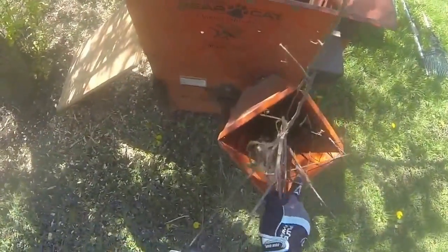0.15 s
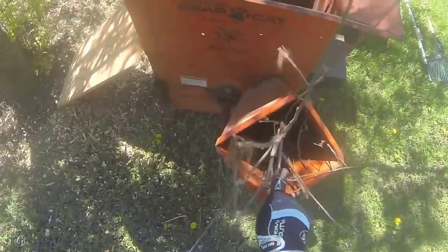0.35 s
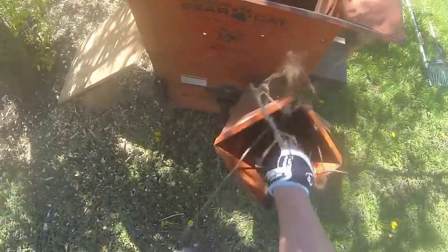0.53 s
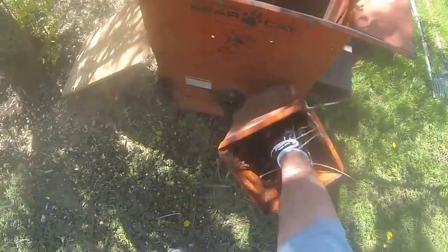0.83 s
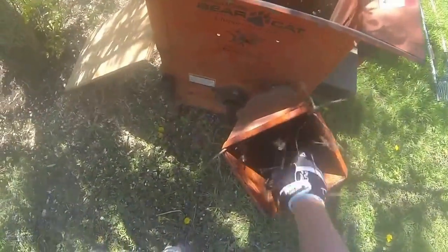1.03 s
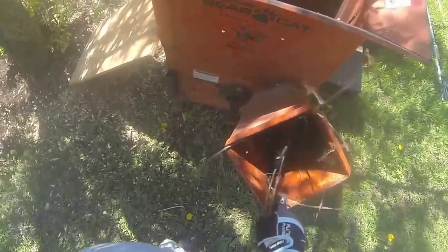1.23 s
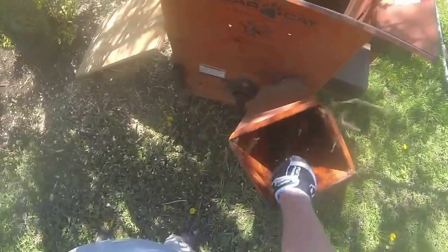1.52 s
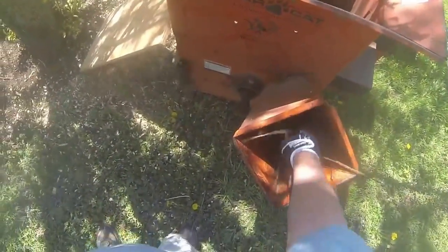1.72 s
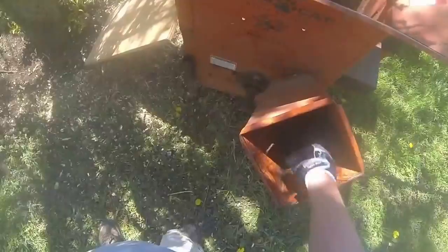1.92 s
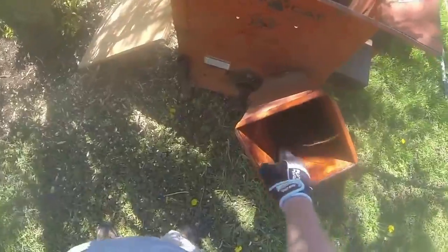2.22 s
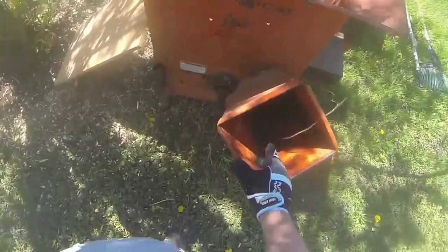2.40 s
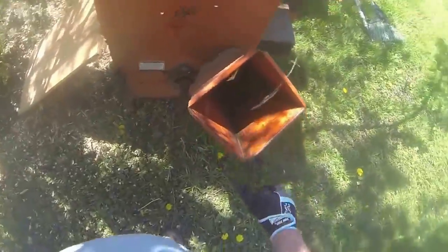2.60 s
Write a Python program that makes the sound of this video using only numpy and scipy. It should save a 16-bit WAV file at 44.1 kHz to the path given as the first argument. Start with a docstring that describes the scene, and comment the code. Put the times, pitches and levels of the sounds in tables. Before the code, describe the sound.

Wood chipper running steadily in a yard, roaring and crackling harshly as branches are fed in twice

```python
"""An engine drones and air roars in a yard; then a wood chipper chops two handfuls of branches.
The four-knife rotor turns about 35 times a second, its speed sagging under load; it hums at its multiples.
Each knife pass bursts noise and growls in thick stems; stubs tick on two knives; hopper modes and brief
tones ring. Blows of thick pieces and twig snaps stand out. All but the hopper, the brief tones and the
ringing case is coloured by the resonances of a closed camera housing."""
import sys
import numpy as np
from scipy import signal
from scipy.io import wavfile
from scipy.ndimage import uniform_filter1d

SR = 44100
rng = np.random.default_rng(int(sys.argv[2]) if len(sys.argv) > 2 else 0)


def master_out(mix):
    """Clip the mix to full scale and print it as 16-bit PCM to the path in sys.argv[1]."""
    frames = np.transpose(np.atleast_2d(mix))
    ceiling = np.clip(frames, -1, 1)
    pcm = np.round(ceiling * 32767).astype(np.int16)
    wavfile.write(sys.argv[1], SR, pcm)


def gain_from_decibels(decibels):
    """Convert decibel values to linear amplitude factors."""
    exponent = np.asarray(decibels, float) / 20
    return 10 ** exponent


N = 121275
T = np.arange(N) / SR  # time [s]

# Levels in the tables are relative: the sources add offsets, and the housing colours most of them.
# rotor speed: (time [s], speed [turns/s])
ROTOR_SPEED = [(0, 35.1), (.45, 35.08), (.65, 34.45), (.8, 33.9), (1, 33.95), (1.25, 34.45), (1.7, 34.4),
               (1.9, 34.2), (2.2, 34.3), (2.4, 34.65), (2.75, 34.9)]
# wood against the knives: (time [s], load [dB])
WOOD_LOAD = [(0, -33.5), (.38, -32), (.46, -22.5), (.55, -12), (.8, -16.5), (.93, -26.5), (1.05, -25.5),
             (1.25, -22), (1.31, -19), (1.37, -28), (1.5, -22.5), (1.59, -15.5), (1.78, -14), (1.92, -20),
             (2.01, -21.5), (2.09, -16), (2.25, -26), (2.36, -38)]
# depth of cut, heard in the knife tone: (time [s], depth [dB])
CUT_DEPTH = [(.44, -55), (.53, -29), (.62, -26), (.81, -26), (.95, -41), (1.03, -43), (1.17, -37),
             (1.22, -46), (1.3, -35), (1.34, -46), (1.5, -46), (1.6, -33), (1.74, -26), (1.86, -33),
             (2.02, -36), (2.09, -31), (2.18, -38), (2.32, -55)]
# thickness of the stems being fed: (time [s], level [dB])
STEM_THICKNESS = [(0, -9), (.5, -11), (.9, -15), (1.5, -25), (1.8, 5.5), (2, 3.5), (2.15, 8), (2.3, -10)]
# thin stubs grazing two opposite knives: (time [s], tick level [dB], leafy smear level [dB])
GRAZING_STUBS = [(0, -48, -46), (.36, -46, -46), (.42, -38, -36), (.5, -36, -36), (.7, -36, -36),
                 (.9, -42, -42), (1.05, -36, -40), (1.2, -33, -40), (1.35, -36, -42), (1.48, -38, -42),
                 (1.58, -36, -34), (1.75, -36, -34), (2, -38, -40), (2.25, -40, -44), (2.32, -30, -42),
                 (2.42, -34, -54), (2.5, -33, -56), (2.75, -34, -58)]
# hard stub strikes: (time [s], level [dB])
STUB_STRIKES = [(1.3444, -31), (1.3487, -14), (1.379, -16), (1.4082, -12), (1.4436, -18), (2.4558, -30.5)]
# thick pieces knocked through: (time [s], level [dB], length [s])
THICK_KNOCKS = [(0.5142, -5.5, 0.0066), (0.531, -11.5, 0.0064), (0.58, -15, 0.005), (0.637, -15, 0.0059),
                (0.6609, -6, 0.0038), (0.6922, -3.5, 0.0046), (0.7183, -0.5, 0.0042), (0.746, -17, 0.0059),
                (0.7737, -2, 0.0068), (0.8034, 1.5, 0.0053), (1.3049, -8, 0.005), (1.594, -7, 0.0081),
                (1.727, -3.5, 0.0092), (1.7886, -8, 0.0046), (1.801, -2, 0.0072), (1.8256, -1.5, 0.005),
                (1.936, -4.5, 0.0046), (1.9417, -4.5, 0.01), (1.9634, -3, 0.0033), (1.9726, -3, 0.0047),
                (2.0737, -3.5, 0.0057), (2.0886, -6.5, 0.0063), (2.1, -4, 0.0047), (2.113, -9, 0.0057),
                (2.2154, -3.5, 0.005), (2.2811, -7.5, 0.0043), (2.2878, -10, 0.0037)]
# twig snaps: (time [s], level [dB], frequency [Hz])
TWIG_SNAPS = [(.418, -24, 3380), (.433, -21, 3540), (.447, -24, 2520), (.505, -10.5, 3700),
              (1.707, -14, 3580), (2.278, -20, 2800)]
# rotor hum: (multiple of speed [1], idle level [dB], level at full depth [dB])
ROTOR_ORDERS = [(2.03, -56.5, -63), (3.99, -54, -25.5), (6.084, -47, -43), (7.94, -62.5, -34.5),
                (9.08, -56.5, -43), (10.195, -54.5, -49), (12, -52, -50), (14.08, -54, -38.5),
                (15, -74, -35), (15.9, -90, -43.5), (18.1, -56.5, -34), (19.81, -96, -36),
                (22.08, -54.5, -41), (30, -58.5, -35), (12.95, -66, -46.5), (18.68, -55, -39),
                (23.85, -58, -34), (27.75, -50, -59), (35.6, -63.5, -36)]
# exhaust tones: (frequency [Hz], level [dB])
EXHAUST_TONES = [(91.5, -48), (183, -48.5), (266, -54.5)]
# hopper panel modes: (frequency [Hz], width [Hz], level at full depth [dB])
HOPPER_MODES = [(306, 3.7, -40.5), (631, 12, -36), (1416, 25, -31.5), (1483, 10.8, -23.5)]
# brief ringing tones: a rotor multiple near 975 Hz, then panel tones near 306 Hz:
# (time [s], level [dB], frequency [Hz], 60 dB decay time [s])
BRIEF_TONES = [(.44, -28, 975, .25), (0.621, -42, 307, 1.5), (.78, -33, 306, 1.9), (1.699, -30, 308, 1.8),
               (2.08, -29, 304, 1), (2.21, -33, 305, 0.54)]
# bite of each knife: (level [dB])
KNIFE_BITE = [-4.5, 0.8, -1, 6.3]
# source colours before the housing, each: (frequency [Hz], level [dB])
IDLE_COLOUR = [(20, 12), (50, 0.5), (200, 11.5), (700, 7), (1500, 3.5), (4000, 0), (8000, 1), (15000, -8)]
CHOP_COLOUR = [(20, -39), (80, -6), (250, 0.5), (700, 6), (1500, 5), (4000, 5.5), (8000, 7), (15000, -4.5)]
TICK_COLOUR = [(500, 0), (2500, -21), (5000, 3), (9000, 6.5), (15000, -2.5)]
STRIKE_COLOUR = [(500, -26), (2500, -14), (5000, 7.5), (9000, 4.5), (15000, -14)]
KNOCK_COLOUR = [(200, -22), (600, -1), (1400, 3), (2600, 5), (6000, -22), (15000, -38)]
STEM_COLOUR = [(250, -32), (450, -7), (650, 1.5), (850, -7), (1100, -21.5)]
# broad tilt of the camera housing: (frequency [Hz], level [dB])
HOUSING_TILT = [(20, -0.5), (900, 0), (1100, -4.5), (1950, -3.5), (3300, 2), (4500, -9), (8000, -14),
                (15000, -15.5)]
# resonances of the camera housing: (frequency [Hz], width [Hz], level [dB])
HOUSING_MODES = [(1258, 77, 10), (1344, 74, 20.5), (1490, 250, 12.5), (1584, 180, 13), (1687, 55, 12.5),
                 (2306, 223, 6), (2740, 268, 6), (3210, 67, -1.5), (3700, 270, -1.5), (5205, 480, 3.5),
                 (5430, 640, 0.5), (6190, 800, -2), (8670, 2800, -13), (11270, 1900, -11)]

START_TURN = -.01  # rotor angle at time zero [turns]
KNIVES = 4
IDLE_DB, IDLE_BEAT = -33, 0.21  # roar offset [dB], beat depth [1]
FULL_DEPTH_DB, FULL_LOAD_DB = -26, -13.5  # table levels taken as 0 dB
CHOP_DB, CHOP_BED, CHOP_S, CHOP_SPREAD_DB = -6.5, 0.59, 0.004, 2.5  # offset, bed [1], decay, spread
SPLINTERS_PER_S, SPLINTER_DB = 1500, -26  # mean rate, least level
TICK_DB, TICK_S, SMEAR_S, TICK_SPREAD_DB = 16.5, 0.001, 0.0042, 2.5  # offset, two decays, spread
STRIKE_DB, KNOCK_DB, GROWL_DB = 4.5, -6.5, -11.5  # offsets
CASE_HZ = 1394  # nominal case resonance, detuned at each knock
CEILING, EDGE_HZ = 1.05, 14900  # overload limit [full scale], treble limit [Hz]


def evened(x):
    """Normalisation: a signal divided by its rms value has unit power."""
    return x / np.sqrt(np.mean(x ** 2) + 1e-20)


def curve(points):
    """Linear interpolation of a two-column table over time."""
    return np.interp(T, *np.transpose(points))


def read(points, hz):
    """Interpolation of a level over logarithmic frequency."""
    f, value = np.transpose(points)
    return np.interp(np.log(hz + 1), np.log(f + 1), value)


def colour(x, gain_db):
    """Minimum-phase filtering: the Hilbert transform of the log gain gives the phase of a causal filter."""
    log_gain = np.log(gain_from_decibels(gain_db(abs(np.fft.fftfreq(8192, 1 / SR)))))
    response = np.exp(np.conj(signal.hilbert(log_gain)))
    taps = np.fft.ifft(response).real[:4096]
    return signal.oaconvolve(x, taps)[:N]


def wander(seconds):
    """Slow chance: white noise smoothed by two moving averages, at unit rms."""
    size = max(int(seconds * SR), 2)
    smooth = uniform_filter1d(rng.standard_normal(N), size)
    return evened(uniform_filter1d(smooth, size))


def bursts(clicks, decay_s):
    """Impulse response of an impact: a quick rise followed by exponential decay."""
    t = np.arange(2000) / SR / decay_s
    return signal.oaconvolve(clicks, (1 - np.exp(-3 * t)) * np.exp(-t))[:N]


def clicks_at(events):
    """Impulses: an event is one sample of given level."""
    out = np.zeros(N)
    for s, db in events:
        out[round(s * SR)] = gain_from_decibels(db)
    return out


def turns():
    """Rotor angle [turns] is the time integral of rotor speed."""
    return START_TURN + np.cumsum(curve(ROTOR_SPEED)) / SR


def knife_passes(spread_db):
    """Periodic excitation: one click of chance size as each knife passes, with the knife number."""
    step = np.floor(KNIVES * turns() + .34)
    size = gain_from_decibels(spread_db * rng.standard_normal(N))
    passing = np.diff(step, prepend=step[0]) > 0
    return size * passing, step.astype(int) % KNIVES


def depth():
    """Depth of cut as a gain, falling far below unity when the knives run free."""
    depth_db = np.interp(T, *np.transpose(CUT_DEPTH), left=-70, right=-70)
    return gain_from_decibels(depth_db - FULL_DEPTH_DB)


def idling():
    """Amplitude modulation: air and engine roar beats at the knife rate, over wavering exhaust tones."""
    beat = 1 + IDLE_BEAT * np.cos(2 * np.pi * KNIVES * turns())
    gate = beat * gain_from_decibels(1.0 * wander(0.1))
    out = colour(rng.standard_normal(N) * gate, lambda hz: read(IDLE_COLOUR, hz) + IDLE_DB)
    for hz, db in EXHAUST_TONES:
        level = gain_from_decibels(db + 2.5 + 0.73 * wander(0.036))
        out += level * np.sin(2 * np.pi * hz * T + 0.21 * wander(0.094))
    return out


def hum():
    """Order tones: multiples of rotor speed vary with depth of cut, the higher ones wavering more."""
    out, deep, angle = np.zeros(N), depth(), turns()
    for order, idle_db, full_db in ROTOR_ORDERS:
        cutting = gain_from_decibels(full_db + 3 + .25 * order ** .5 * wander(.06)) * deep
        phase = 2 * np.pi * (order * angle + rng.random()) + 0.016 * order * wander(0.13)
        out += (gain_from_decibels(idle_db + 3) + cutting) * np.sin(phase)
    return out


def chopping():
    """Gated noise: each knife pass bursts, over a steady grinding bed and splinters at random times."""
    clicks, knife = knife_passes(CHOP_SPREAD_DB)
    bites = bursts(clicks * gain_from_decibels(KNIFE_BITE)[knife], CHOP_S)
    splinter_db = SPLINTER_DB + 2.3 * np.minimum(rng.exponential(1, N), 4)
    splinters = gain_from_decibels(splinter_db) * (rng.random(N) < SPLINTERS_PER_S / SR)
    gate = evened(CHOP_BED + bites + bursts(splinters, 0.0014))
    gate = gate * gain_from_decibels(curve(WOOD_LOAD) + CHOP_DB + 1.06 * wander(0.03))
    return colour(gate * rng.standard_normal(N), lambda hz: read(CHOP_COLOUR, hz))


def ticking():
    """Brief contact excites high frequencies: ticks and longer smears on two knives, and hard strikes."""
    clicks, knife = knife_passes(TICK_SPREAD_DB)
    s, tick_db, smear_db = np.transpose(GRAZING_STUBS)
    odd = clicks * (knife % 2) * gain_from_decibels(TICK_DB)  # two opposite knives
    ticks = bursts(odd * gain_from_decibels(np.interp(T, s, tick_db)), TICK_S)
    smears = bursts(odd * gain_from_decibels(np.interp(T, s, smear_db)), SMEAR_S)
    hard = bursts(clicks_at(STUB_STRIKES) * gain_from_decibels(STRIKE_DB), 0.0013)
    grazing = colour((ticks + smears) * rng.standard_normal(N), lambda hz: read(TICK_COLOUR, hz))
    return grazing + colour(hard * rng.standard_normal(N), lambda hz: read(STRIKE_COLOUR, hz))


def growl():
    """Forced vibration: thick stems shudder against the chute at every knife pass."""
    clicks, _ = knife_passes(5.3)
    level_db = curve(WOOD_LOAD) - FULL_LOAD_DB + curve(STEM_THICKNESS) + GROWL_DB
    gate = evened(0.51 + bursts(clicks, .003)) * gain_from_decibels(level_db)
    return colour(gate * rng.standard_normal(N), lambda hz: read(STEM_COLOUR, hz))


def hopper():
    """Modal resonance: noise that follows the depth of cut shakes the sheet-metal modes."""
    out = np.zeros(N)
    shaking = depth() * rng.standard_normal((len(HOPPER_MODES), N))
    for (hz, width_hz, db), force in zip(HOPPER_MODES, shaking):
        # shift the mode to zero frequency, smooth it there, and shift it back
        turn, r = np.exp(2j * np.pi * hz * T), np.exp(-np.pi * width_hz / SR)
        mode = (turn * signal.lfilter([1], [1, -r], force / turn)).real
        out += gain_from_decibels(db) * np.sqrt(4 * (1 - r)) * mode
    return out


def knocking():
    """Impact noise: a thick piece gives one decaying burst, a twig snap a noisy, fast-dying tone."""
    gate = np.zeros(N)
    for s, db, length in THICK_KNOCKS:
        gate += bursts(clicks_at([(s, db)]) * gain_from_decibels(KNOCK_DB), length / 2)
    out = colour(gate * rng.standard_normal(N), lambda hz: read(KNOCK_COLOUR, hz))
    t = np.arange(800) / SR
    for s, db, hz in TWIG_SNAPS:
        rough = 1 + 0.44 * rng.standard_normal(800)
        out[round(s * SR):][:800] += gain_from_decibels(db - t / 0.00031) * np.sin(2 * np.pi * hz * t) * rough
    return out


def brief_tones():
    """Exponential decay: a tone at a rotor multiple, then panel tones, rise quickly and die away."""
    out = np.zeros(N)
    for s, db, hz, t60 in BRIEF_TONES:
        t = np.maximum(T - s, 0)
        envelope = gain_from_decibels(db + 2.5 - 60 * t / t60) * np.minimum(t / 0.013, 1)
        out += envelope * np.sin(2 * np.pi * (hz * t + rng.random()))
    return out


def case_rings():
    """Transient resonance: each knock jolts the camera case into a few cycles near its main mode."""
    out, t = np.zeros(N), np.arange(1500) / SR
    chances = rng.random((len(THICK_KNOCKS), 2))
    for (s, db, length), (detune, phase) in zip(THICK_KNOCKS, chances):
        u = 3.08 * t / length
        hz = CASE_HZ * (0.958 + 0.1 * detune)
        envelope = gain_from_decibels(db - 3.0) * u * np.exp(1 - u)  # peaks at u = 1
        out[round(s * SR):][:1500] += envelope * np.sin(2 * np.pi * (hz * t + phase))
    return out


def housing_db(hz):
    """Enclosure response: the powers of a broad tilt and steep case resonances add."""
    power = gain_from_decibels(2 * read(HOUSING_TILT, hz))
    for f, width_hz, db in HOUSING_MODES:
        power = power + gain_from_decibels(2 * db) / (1 + (2 * (hz - f) / width_hz) ** 2) ** 2
    return 10 * np.log10(power)


def scene():
    """Superposition: sources filtered by the housing add to the hopper, brief tones and case ringing."""
    sources = idling() + hum() + chopping() + ticking() + growl() + knocking()
    return (colour(sources, housing_db) + hopper() + brief_tones() + case_rings())[None]


def roll_off(x):
    """The treble ends steeply here."""
    return signal.sosfilt(signal.butter(12, 15700, fs=SR, output="sos"), x)


def record(dry):
    """Saturation bends the peaks softly; a low-pass filter then limits the treble."""
    soft = CEILING * np.tanh(dry / CEILING)
    limited = signal.oaconvolve(soft, signal.firwin(91, EDGE_HZ, fs=SR)[None], "same")
    return roll_off(limited)


dry = scene()
out = record(dry)
master_out(out)
```